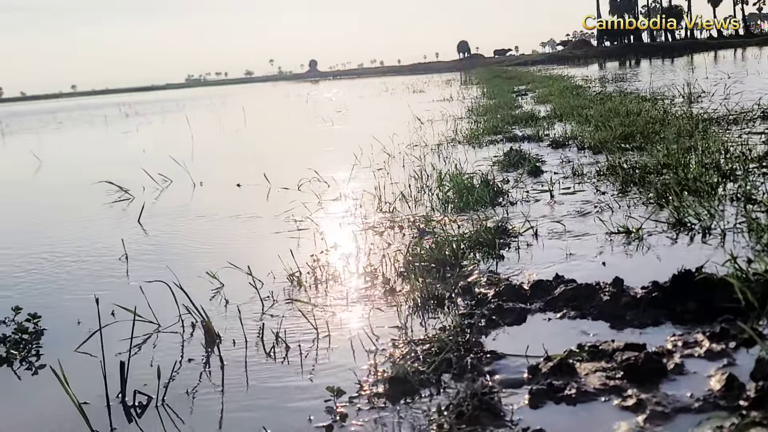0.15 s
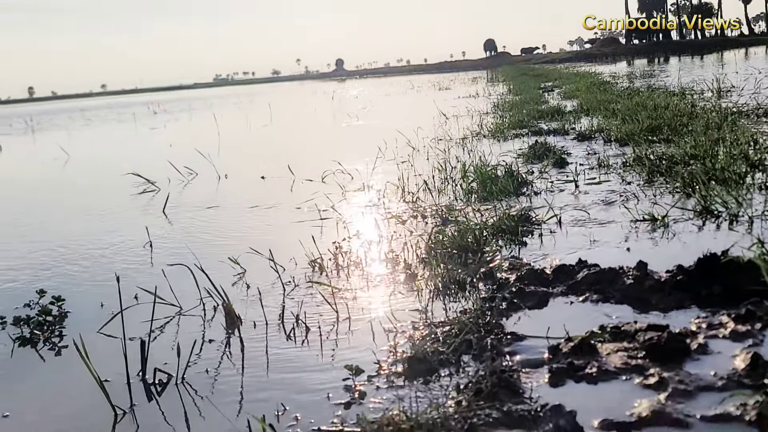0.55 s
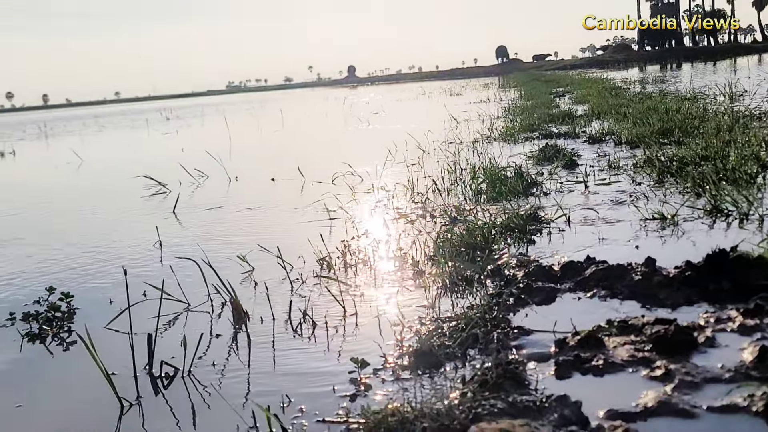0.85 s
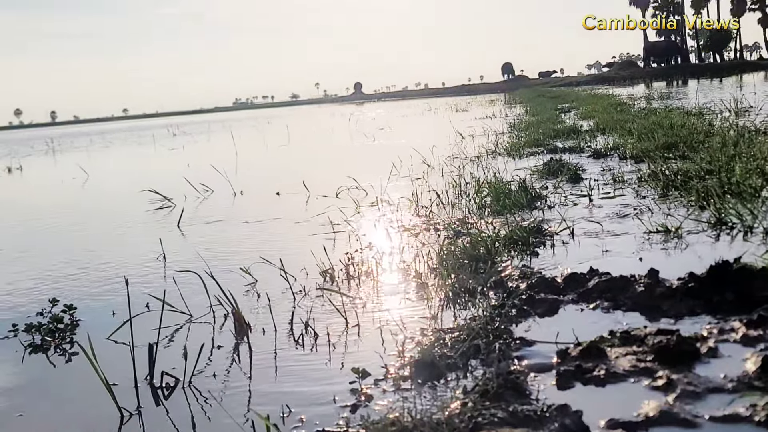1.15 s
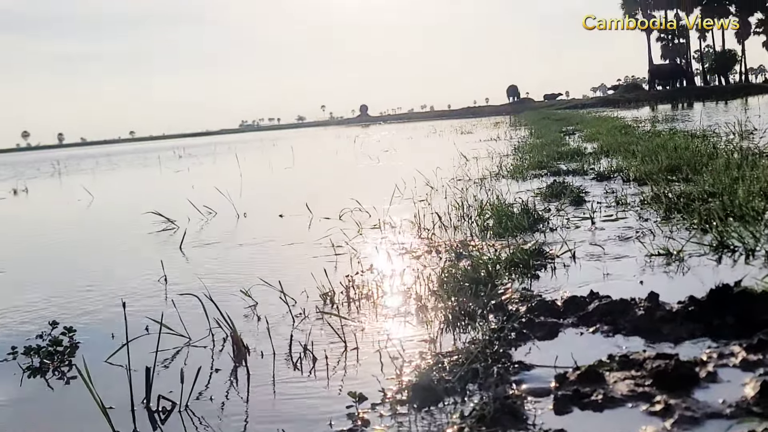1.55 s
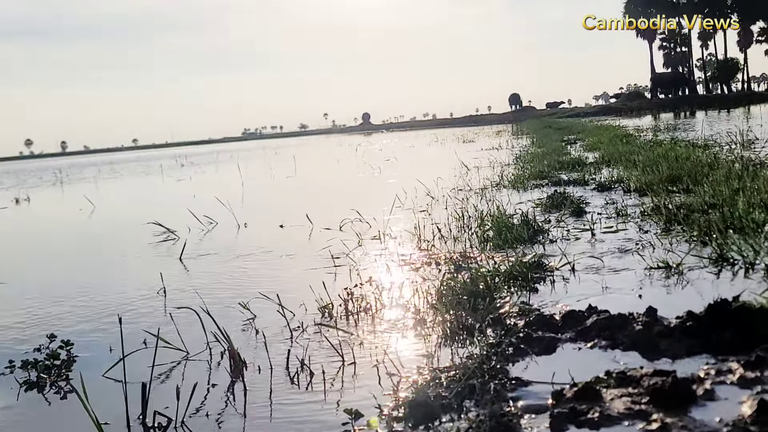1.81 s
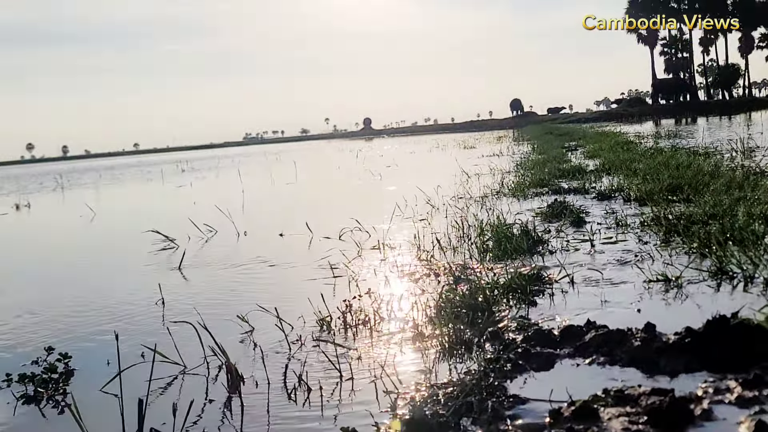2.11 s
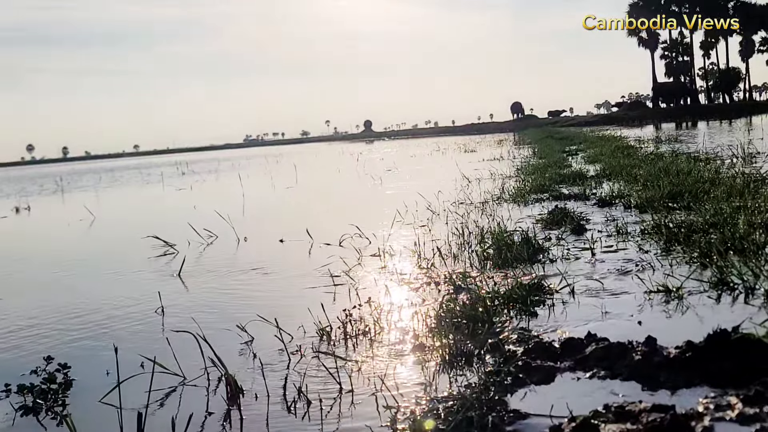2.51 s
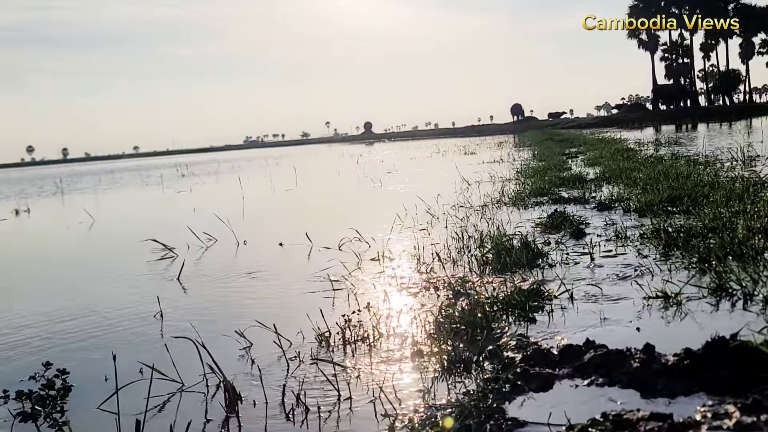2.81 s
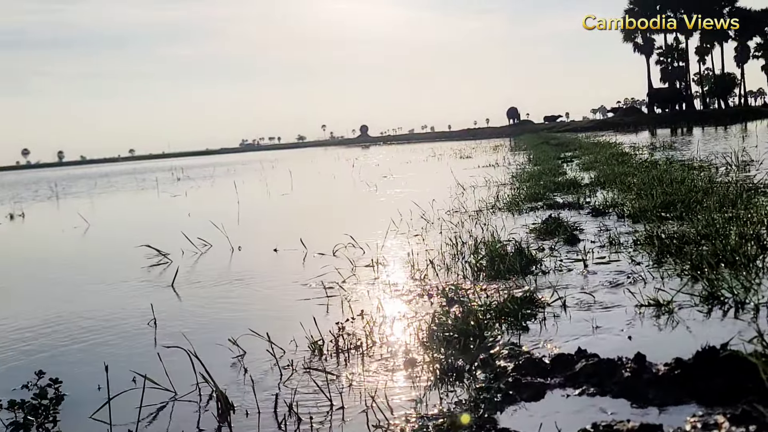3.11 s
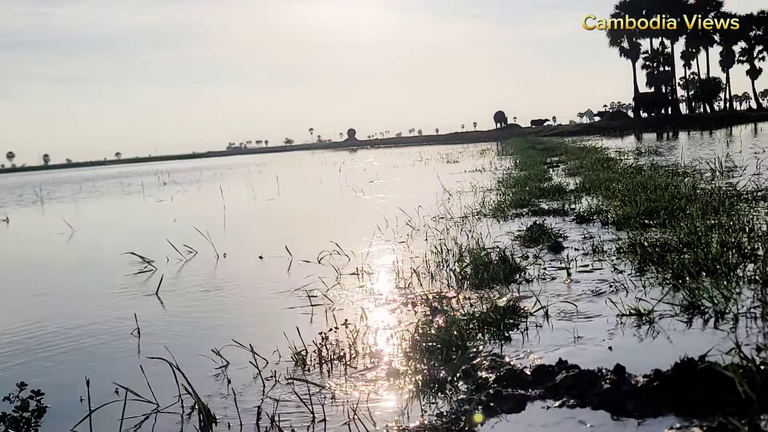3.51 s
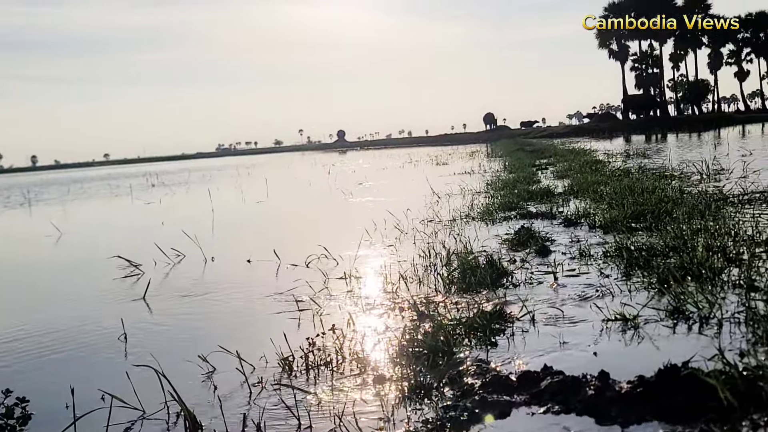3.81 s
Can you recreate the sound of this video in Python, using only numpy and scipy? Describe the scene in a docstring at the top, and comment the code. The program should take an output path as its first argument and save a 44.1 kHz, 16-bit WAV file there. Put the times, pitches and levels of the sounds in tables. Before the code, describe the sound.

Frogs croak in quick, bright pulses over a distant chorus and low wind rumble.

```python
"""A frog croaks close by in a flooded field, and others answer and chuckle around it.
Each croak is a fast train of clicks that slows down and rings the frog's vocal sac near 3.6 kHz.
Later come a few sharp chirps. Behind it all are a distant frog chorus and two insects,
while wind rumbles on the two spaced microphones."""
import sys
import numpy as np
from scipy import signal
from scipy.fft import rfft, irfft
from scipy.io import wavfile
from scipy.ndimage import uniform_filter1d, minimum_filter1d

SR = 44100
rng = np.random.default_rng(int(sys.argv[2]) if len(sys.argv) > 2 else 0)


def dump(signal):
    """Clip the signal to [-1, 1] and save it as 16-bit WAV at the path in sys.argv[1]."""
    limited = np.clip(np.atleast_2d(signal).T, -1, 1)
    pcm = np.round(limited * 32767).astype(np.int16)
    wavfile.write(sys.argv[1], SR, pcm)


N = 174195
T = np.arange(N) / SR
SAC_HZ, TOP_HZ = 3600, 15900  # usual pitch of a vocal sac; where the treble is cut
PAN_DB, PAN_DB_PER_MS = -1, -5.5  # left minus right level: the side reached later is softer


# the close frog's croaks (start [s], length [s], level [dB])
NEAR_CROAKS = [(0.033,0.084,-1.5),(.275,0.087,-6.5),(0.525,0.084,-4.5),(0.776,0.08,-5.5),(1.036,0.088,-6),(1.315,0.087,-3.5),(2.889,0.073,-19),(3.15,0.049,-18),(3.391,0.058,-22),(3.716,0.065,-19.5)]
# the tone of its throat (frequency [Hz], level [dB])
NEAR_THROAT = [(900,-32),(1300,-23.5),(1750,-17),(2600,-14),(3150,-1.5),(3700,5),(4200,-9),(4900,-9),(6800,-17),(8000,-35),(9000,-33.5),(10000,-29),(11000,-25),(12200,-33.5),(15000,-53)]
# loudness through one croak (share of its length [0-1], level [dB])
NEAR_LOUDNESS = [(0,5),(.45,11),(.85,13),(1,-19.5)]
# how much louder it is on the left (time [s], left minus right [dB])
NEAR_BALANCE = [(1.4,2.5),(3.7,7)]

def near_frog():
    """Bright croaks whose ring sinks in pitch as the air runs out; the soft ones are duller."""
    out = np.zeros((2, N))
    for start, length, db in NEAR_CROAKS:
        dulling_db = min(db + 6.5, 0)
        throat = ring([(hz, level + dulling_db * (hz > 9500)) for hz, level in NEAR_THROAT])
        call = croak(throat, length, rate_hz=468, slowing=.28, arch=0, shape=NEAR_LOUDNESS,
                     sac=lambda u: 1 + .11 * (.5 - u), jitter=.011, scatter_db=3)
        add(out, call, start, db, curve(NEAR_BALANCE, start), lag_ms=-.442)
    return out


# the neighbours' hard and soft croaks (start [s], length [s], level [dB], left side's delay [ms])
HARD_CROAKS = [(.123,0.061,-12.5,-.02),(.461,0.036,-9.5,.25),(.494,0.038,-10.5,-.02),(.696,0.041,-13.5,-.02),(.735,0.039,-8.5,.48),(.899,0.059,-15,.25),(1.272,0.069,-10.5,-.02),(1.513,.06,-12.5,-.02),
               (1.757,0.068,-13.5,-.02),(1.996,0.066,-10,.25),(2.22,.07,-11.5,-.02)]
SOFT_CROAKS = [(.33,0.083,-14.5,0.22),(.625,0.073,-13.5,0.15),(.955,0.092,-13.5,0.2),(1.688,0.071,-11.5,0.19),(1.84,0.072,-19.5,-.02),(2.505,0.097,-14.5,-0.068),(2.615,0.088,-24,-0.16),
               (2.798,0.11,-16.5,0.24),(3.04,0.061,-21,0.23),(3.105,0.072,-21,0.33),(3.195,0.06,-15,-0.46),(3.28,0.061,-16,0.19),(3.525,0.065,-11,0.49),(3.778,0.051,-17.5,0.2),(3.85,0.083,-18.5,-0.5)]
# loudness through each kind (share of its length [0-1], level [dB])
HARD_LOUDNESS = [(0,8),(.3,9),(.85,7.5),(1,-0.5)]
SOFT_LOUDNESS = [(0,-1),(.35,5),(.75,7),(1,-10)]
# the tone of their throats (frequency [Hz], level [dB])
THROAT = [(900,-44.5),(1300,-42),(1750,-19),(2600,-15),(3150,-2.5),(3600,9),(3950,-1.5),(4500,-17),(5200,-22.5),(6200,-19),(7000,-21),(8000,-92),(10500,-51),(11800,-37.5),(16000,-67.5)]

def neighbours():
    """Rounder croaks: hard ones start at once and fall; soft ones swell as their pitch rises and falls."""
    out, throat = np.zeros((2, N)), ring(THROAT)
    for table, rate_hz, sac_hz, arch, shape in ((HARD_CROAKS, 485, 3583, 0, HARD_LOUDNESS),
                                                (SOFT_CROAKS, 440, 3618, .13, SOFT_LOUDNESS)):
        for start, length, db, lag in table:
            pace, tiring, pitch = rng.uniform(-1, 1, 3)
            slowing = (.16 - arch) * (1 + .5 * tiring)
            sac = tightening_sac(sac_hz * (1 + .035 * pitch))
            call = croak(throat, length, rate_hz * (1 + .06 * pace), slowing, arch, shape, sac,
                         jitter=.022, scatter_db=2)
            add(out, call, start, db, PAN_DB + PAN_DB_PER_MS * lag, lag)
    return out


# short, low frog calls (start [s], length [s], level [dB], left side's delay [ms])
CHUCKLES = [(1.143,0.022,-17,0.49),(1.161,0.034,-12,0.48),(1.2535,0.013,-16.5,-0.37),
            (1.427,.006,-13.5,0.5),(1.4494,0.0072,-11.5,0.46),(1.47,0.032,-13,0.53),(1.613,0.033,-15,0.44),
            (1.941,0.018,-12.5,0.48),(2.092,0.038,-14,0.48),(2.306,.02,-18,-.36),(2.366,0.017,-14.5,-0.37)]

def chuckles():
    """A few slower, fading clicks ring the sac at a lower pitch: a rounded pip."""
    out, throat = np.zeros((2, N)), ring(THROAT)
    for start, length, db, lag in CHUCKLES:
        call = croak(throat, length, rate_hz=310, slowing=.077, arch=0, shape=[(0, 0), (1, -6.5)],
                     sac=lambda u: 3246 / SAC_HZ, jitter=.08, scatter_db=2.5)
        add(out, call, start, db, PAN_DB + PAN_DB_PER_MS * lag, lag)
    return out


# squeaks (start [s], length [s], first pitch [Hz], last pitch [Hz], level [dB], brightest at [Hz])
CHIRPS = [(2.7245,0.035,1390,1003,-16,6050),(2.7792,0.017,1830,1690,-12,3550),(3.416,0.0356,1194,1007,-20.5,7840),(3.516,0.015,2060,1980,-21.5,2010)]

def chirps():
    """Short falling squeaks with a harsh, bright start, perhaps from a bird."""
    out = np.zeros((2, N))
    width_octaves, fade_s = .21, .02  # of the bright start
    for start, length, first_hz, last_hz, db, bright_hz in CHIRPS:
        t = T[:int(length * SR)]
        u = t / length
        slide_hz = last_hz + (first_hz - last_hz) * np.exp(-4 * u)
        roughness = unit(uniform_filter1d(rng.standard_normal(len(t)), size=12))
        hz = slide_hz + 175 * np.exp(-2 * t / fade_s) * roughness
        phase, call = 2 * np.pi * np.cumsum(hz) / SR, 0
        for harmonic in range(1, 11):
            ratio = harmonic * slide_hz / bright_hz
            flash = np.exp(-(np.log2(ratio) / width_octaves) ** 2 - t / fade_s)
            body = amp(-14.5) / (1 + ratio ** 10)
            call = call + (flash + body) * (harmonic * last_hz > 1500) * np.sin(harmonic * phase)
        fades = np.minimum(u / .025, 1) * np.minimum((1 - u) / .43, 1)
        add(out, unit(call * fades), start, db, PAN_DB, lag_ms=-.05)
    return out


# the tone of a throat heard from far away (frequency [Hz], level [dB])
FAR_THROAT = [(1100,-49),(1750,-9.5),(2700,-10.5),(3600,2),(4800,-19.5),(6600,-28.5),(8200,-47),(14000,-56)]

def far_frogs(count=95, drone_hz=847, width_hz=105):
    """Many soft croaks all round, blurred by distance, and the drone of a far-off colony."""
    out, throat = np.zeros((2, N)), ring(FAR_THROAT)
    for k, (when, pace, pitch, loud, where) in enumerate(rng.uniform(-1, 1, (count, 5))):
        sac = tightening_sac(SAC_HZ * (1 + .09 * pitch))
        call = croak(throat, length=.07, rate_hz=440 * (1 + .15 * pace), slowing=.08, arch=.13,
                     shape=SOFT_LOUDNESS, sac=sac, jitter=.021, scatter_db=2)
        start = (k + when) / count * N / SR - .03
        add(out, call, start, db=4 * loud, pan_db=-3 * where, lag_ms=.48 * where)
    drone = unit(band(drone_hz, width_hz) + .5 * np.array([band(drone_hz, width_hz) for _ in range(2)]))
    return amp(-26) * unit(out + echo(out, fade_s=.4)) + amp(-43) * drone


# loudness of the rasping insect (time [s], level [dB])
RASP_LOUDNESS = [(1.7,-73),(2.3,-56.5),(2.9,-52),(3.95,-62)]

def insects(rasp_hz=9350, swells_hz=9.4, teeth_hz=230):
    """One insect rasps in loosely timed swells on a nearly level pitch; another holds a thin whine."""
    swell = .5 + .5 * np.cos(2 * np.pi * swells_hz * (T - 2.65) + .4 * wander(10))
    teeth = 1 + .6 * np.sin(2 * np.pi * teeth_hz * T)
    hz = rasp_hz + 120 * (swell - .5) + 110 * wander(760)
    tone = np.sin(2 * np.pi * np.cumsum(hz) / SR)
    rasp = unit(tone * (swell ** 2 + .15) * teeth * amp(2 * wander(20)))
    whine = np.array([band(hz=15035, width_hz=70) for _ in range(2)])
    return rasp * amp(curve(RASP_LOUDNESS, T)) + amp(-62.5) * whine


# strength of the wind's deep rumble and lighter rush (time [s], level [dB])
RUMBLE_LOUDNESS = [(0,-13),(1.43,-17),(3.1,-12.5),(3.9,-8.5)]
RUSH_LOUDNESS = [(0,-26),(1.2,-27.5),(2.5,-22),(3.9,-25.5)]
# the tone of each (frequency [Hz], level [dB])
RUMBLE_TONE = [(15,-26.5),(42,3),(62,4),(100,-2.5),(160,-7),(230,-18),(400,-71.5)]
RUSH_TONE = [(90,-17.5),(180,1),(380,-14.5),(600,-19.5),(760,-27),(1100,-39.5),(3000,-56.5),(9000,-72.5)]

def wind(shared=.56):
    """Wind buffets both microphones, partly alike and a little harder on the left."""
    def pair(tone):
        return np.sqrt(shared) * noise(tone) + np.sqrt(1 - shared) * np.array([noise(tone), noise(tone)])
    rumble = pair(RUMBLE_TONE) * amp(curve(RUMBLE_LOUDNESS, T) + 3.76 * wander(12))
    rush = pair(RUSH_TONE) * amp(curve(RUSH_LOUDNESS, T) + 3.2 * wander(29.98))
    return rumble * amp([[1.2], [.3]]) + rush * amp([[3], [.8]])


def croak(throat, length, rate_hz, slowing, arch, shape, sac, jitter, scatter_db):
    """Clicks ring the throat. They speed up midway by arch and slow down; sac scales the ring's pitch."""
    chance = np.random.default_rng(rng.integers(1 << 30))
    t = np.arange(int((length + .012) * SR)) / SR
    waver = list(zip(np.linspace(0, 1, 6), .022 * chance.standard_normal(6)))
    out, at = np.zeros(len(t)), 0.
    while at < length:
        u = at / length  # runs from 0 to 1 through the croak
        late, loud, tight = chance.standard_normal(3)
        part = slice(int(at * SR), int(at * SR) + 400)
        pitch = sac(u) * (1 + .012 * tight)
        click = np.interp((t[part] - at) * pitch, *throat, left=0, right=0)
        out[part] += amp(curve(shape, u) + scatter_db * loud) * click
        pace = 1 - slowing * u + arch * np.sin(np.pi * u) + curve(waver, u)
        at += np.exp(jitter * late) / (rate_hz * max(pace, .5))
    return out / np.sqrt(np.sum(out ** 2) / (length * SR))


def ring(tone, size=8192):
    """How a throat with this tone rings after one click, as (times, values)."""
    fine_rate = 4 * SR
    hz = np.fft.rfftfreq(size, 1 / fine_rate)
    cepstrum = irfft(np.log(gains(tone, hz) / (1 + (hz / TOP_HZ) ** 8)))
    # fold it so that all the ringing comes after the click
    cepstrum[1:size // 2] *= 2
    cepstrum[size // 2 + 1:] = 0
    return np.arange(size // 4) / fine_rate, irfft(np.exp(rfft(cepstrum)))[:size // 4]


def tightening_sac(hz):
    """Pitch factor of a sac that rings around hz and tightens in mid-croak."""
    return lambda u: hz / SAC_HZ * (1 + .025 * (np.sin(np.pi * u) - 2 / np.pi))


def echo(sound, fade_s):
    """Sound thrown back by banks and grass, dying away by 60 dB in fade_s."""
    t = T[:SR // 2]
    tail = rng.standard_normal((2, len(t))) * amp(-60 * t / fade_s) * (t > .003)
    tail /= np.sqrt(np.sum(tail ** 2, axis=1, keepdims=True))
    return signal.fftconvolve(sound, tail, axes=1)[:, :N]


def add(out, sound, start, db, pan_db, lag_ms):
    """Place a sound on both microphones, pan_db louder and lag_ms later on the left."""
    for channel, side in enumerate((1, -1)):
        i = int(round((start + side * lag_ms / 2000) * SR))
        a, b = max(i, 0), min(i + len(sound), N)
        if b > a:
            out[channel, a:b] += amp(db + side * pan_db / 2) * sound[a - i:b - i]


def amp(db):
    """Decibels to gain."""
    return 10 ** (np.asarray(db) / 20)


def unit(x):
    """Scale to an average power of 1."""
    return x / np.sqrt(np.mean(x ** 2) + 1e-18)


def curve(points, at):
    """Straight lines through the points."""
    return np.interp(at, *np.array(points, float).T)


def gains(tone, hz):
    """Gain of a tone table at the given frequencies."""
    f, db = np.array(tone, float).T
    return amp(np.interp(np.log(hz + 1), np.log(f), db))


def noise(tone):
    """Noise shaped by a tone table."""
    return unit(irfft(rfft(rng.standard_normal(N)) * gains(tone, np.fft.rfftfreq(N, 1 / SR)), N))


def band(hz, width_hz):
    """A narrow band of noise."""
    f = np.fft.rfftfreq(N, 1 / SR)
    return unit(irfft(rfft(rng.standard_normal(N)) / (1 + (2 * (f - hz) / width_hz) ** 2) ** 2, N))


def wander(rate_hz):
    """A random drift of about 1 either way."""
    step = max(int(SR / rate_hz), 1)
    return unit(uniform_filter1d(np.repeat(rng.standard_normal(N // step + 1), step), step)[:N])


def scene():
    """The nearby calls and their faint echo, over far frogs, insects and wind."""
    calls = near_frog() + neighbours() + chuckles() + chirps()
    return calls + amp(-15) * echo(calls, fade_s=.069) + far_frogs() + insects() + wind()


def record(dry):
    """Turn loud peaks down quickly so that they only just clip, then cut the highest treble."""
    needed = np.minimum(1, 1.08 / (np.abs(dry) + 1e-9))
    gain = uniform_filter1d(minimum_filter1d(needed, size=200, axis=1), size=200, axis=1)
    treble_cut = signal.ellip(8, .2, 70, TOP_HZ, fs=SR, output="sos")
    return signal.sosfilt(treble_cut, np.clip(dry * gain, -1, 1))


dry = scene()
out = record(dry)
dump(out)
```